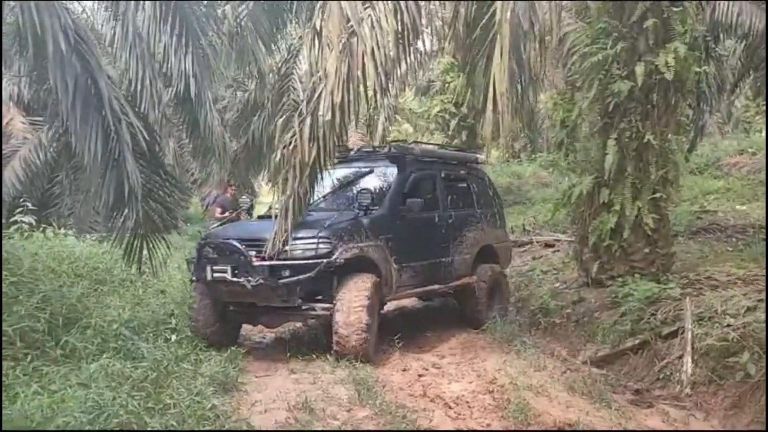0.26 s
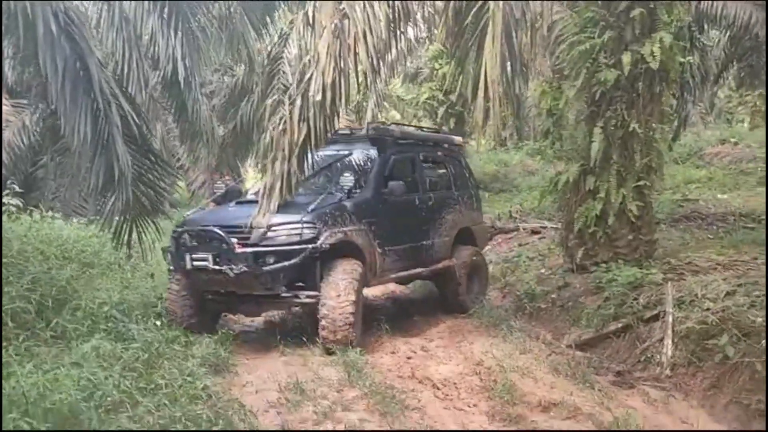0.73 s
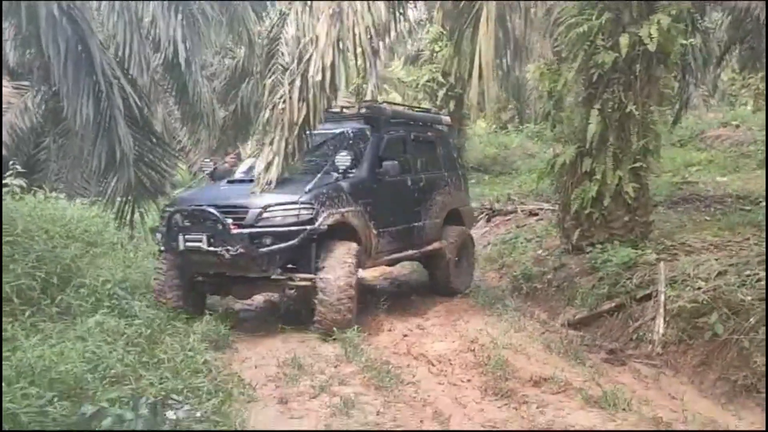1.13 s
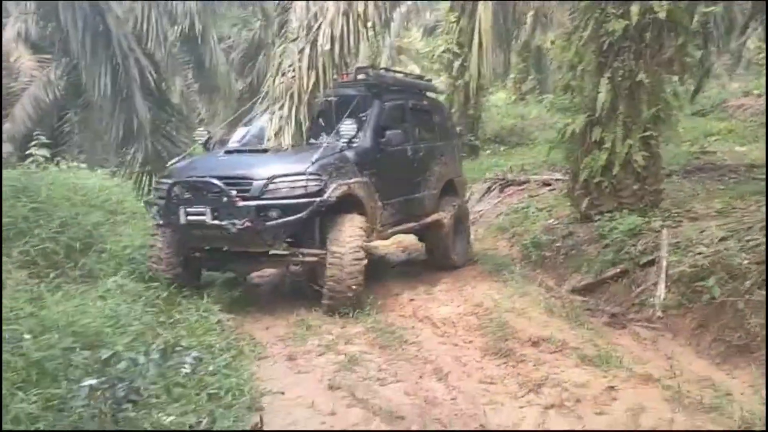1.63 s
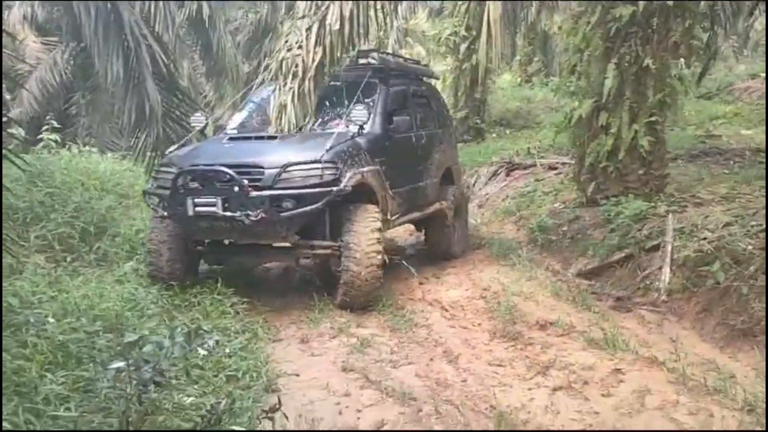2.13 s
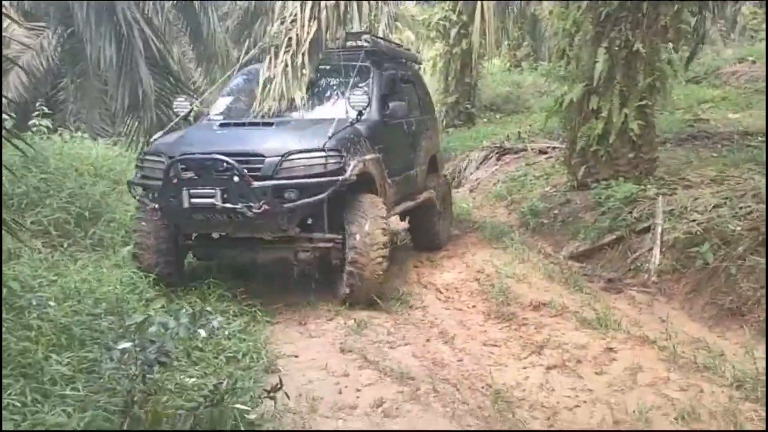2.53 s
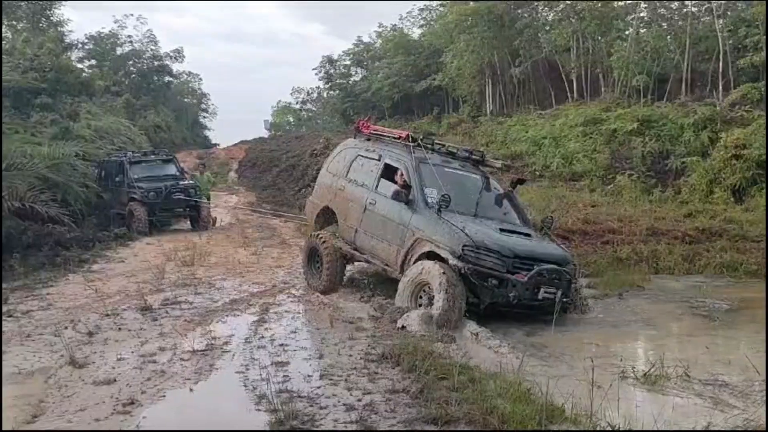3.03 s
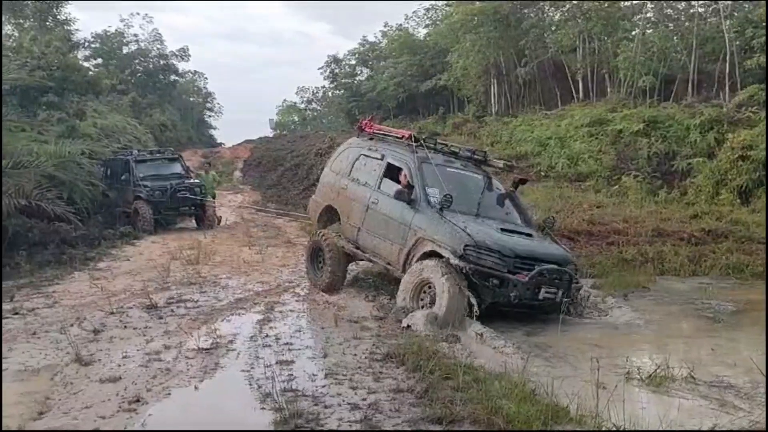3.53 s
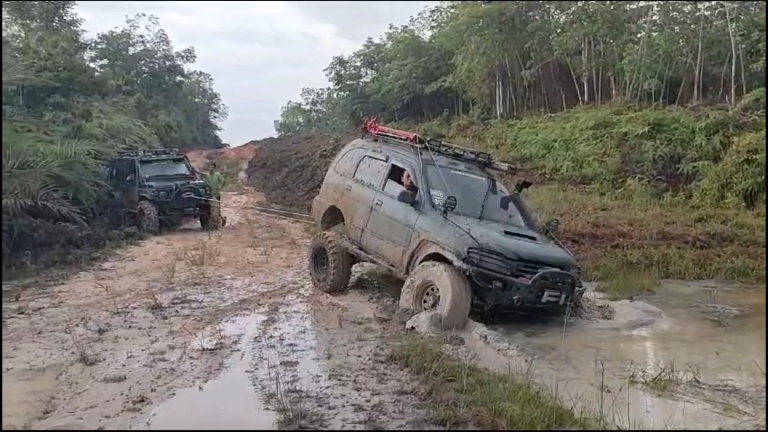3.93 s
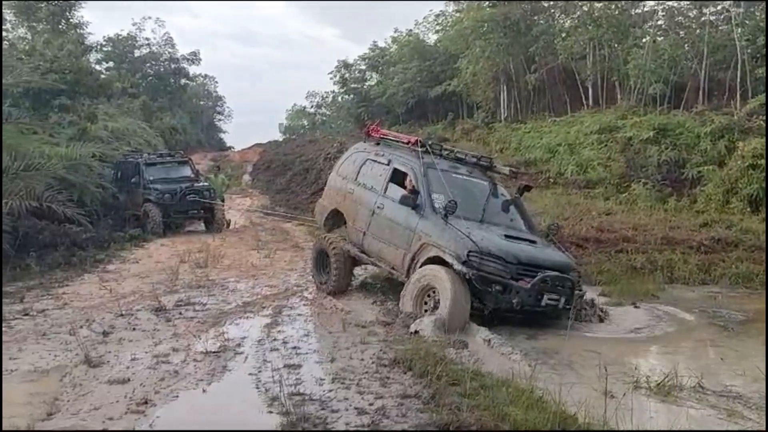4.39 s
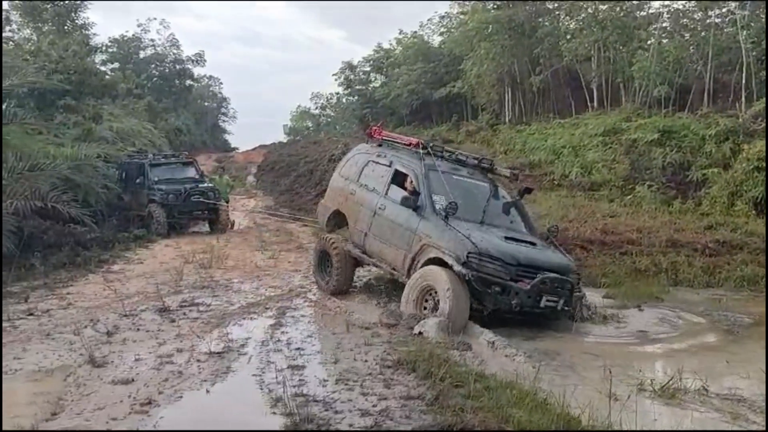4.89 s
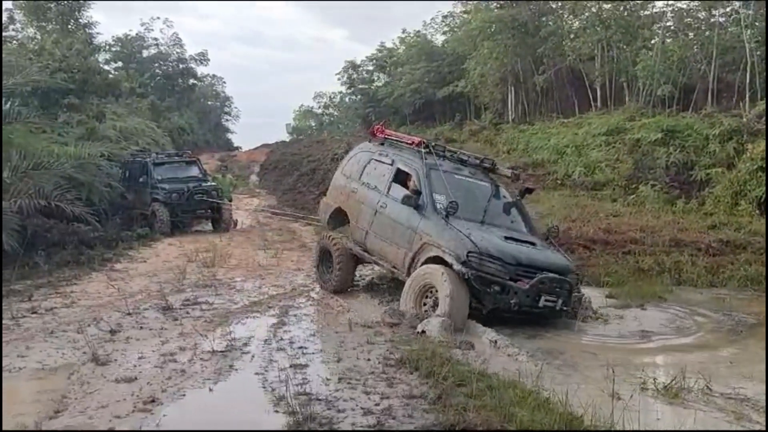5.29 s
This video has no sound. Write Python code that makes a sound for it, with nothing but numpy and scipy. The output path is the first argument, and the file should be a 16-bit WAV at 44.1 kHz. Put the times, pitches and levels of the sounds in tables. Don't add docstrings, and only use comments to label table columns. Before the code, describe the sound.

A lumpy diesel engine growls up and down through mud, cuts to brief silence, then a faster, whining engine strains and winds down.

```python
import sys
import numpy as np
from scipy import signal
from scipy.fft import rfft, irfft, next_fast_len
from scipy.io import wavfile
from scipy.ndimage import uniform_filter1d, map_coordinates

SR = 44100
rng = np.random.default_rng(int(sys.argv[2]) if len(sys.argv) > 2 else 0)


def voltage_ratio(level):
    return 10 ** (np.asarray(level, float) / 20)


def digitize_waveform(pressure):
    field = np.atleast_2d(pressure).T
    bounded = np.clip(field, -1, 1)
    quanta = np.round(bounded * 32767).astype(np.int16)
    wavfile.write(sys.argv[1], SR, quanta)


N = 244781

# time_s, firing_rate_hz, load_db
FIRST_DRIVE = [(0.0, 30.7, -35), (0.18, 32.43, -25.5), (0.32, 35.58, -25), (0.5, 41.17, -17.5),
               (0.7, 44.22, -28), (0.81, 41.8, -20), (0.93, 38.35, -25), (1.04, 35.19, -30.5),
               (1.2, 30.72, -29), (1.37, 29.07, -26.5), (1.49, 33, -28), (1.58, 40.96, -15.5),
               (1.66, 46.16, -25.5), (1.76, 46.35, -27), (1.95, 51.3, -14.5), (2.13, 56.15, -20),
               (2.36, 51, -18), (2.555, 50.85, -16.5)]
# firing_rate_hz, level_db
FIRST_BOOM = [(29, -26), (32, -24), (35, -15), (39, -21), (44, -22.5), (46.5, -32.5), (50, -31),
              (55, -52.5)]
# level_db at mean load and speed, slope_db per Hz of firing rate, unsteadiness_db
FIRST_BARK = (-35.5, 0.44, 0.98)
FIRST_CLATTER = (-39, .02, 0.34)
FIRST_FOLLOW = (.4, 0.8, .5, 0.034)
# level_db at mean speed, slope_db per Hz of firing rate
FIRST_DEPTH = (3.3, -0.3)
# strength_db, lateness (in firings)
FIRST_CYLINDERS = [(-3, 0), (-4, -.012), (2.5, 0), (2, .012)]
# pitch_hz, level_db
FIRST_PIPE = [(15, -44), (30, -52.5), (50, -20.5), (68, 2.5), (95, -8.5), (125, 3), (165, 2.5), (195, 9.5),
              (222, 8), (255, -1.5), (330, 7.5), (400, -7), (520, -23), (1540, -120)]
# pitch_hz, level_db (per Hz)
FIRST_BLOCK = [(240, -2), (400, -21.5), (569, -5.5), (1050, -7.5), (1240, -6), (1640, -10.5), (1880, -4.5),
               (2190, -7.5), (3260, -11), (5740, -15), (6300, -18.5), (7010, -18), (8040, -30.5),
               (13300, -37.5), (15500, -35.5)]
# pitch_hz, likeness (0 to 1)
FIRST_ALIKE = [(400, 0.73), (800, 1), (1400, 0.31), (3000, 0.14), (8000, 0.38)]
# pitch_hz, level_db
FIRST_LEAN = [(60, -22), (150, -1.5), (380, 8), (950, -1), (2380, 0.5), (5980, -5), (15000, 6.5)]


def first_vehicle():
    hz, load_db, on = drive(FIRST_DRIVE)
    *pipe_db, clatter_db = layers(hz, load_db, FIRST_BOOM, FIRST_BARK, FIRST_CLATTER, FIRST_FOLLOW)
    turns = np.cumsum(hz) / SR
    approach_db_per_s = 1.29
    clatter_db = clatter_db + approach_db_per_s * np.arange(N) / SR * on
    depth_db = FIRST_DEPTH[0] + FIRST_DEPTH[1] * (hz - hz[on].mean())
    uneven = np.clip((hz - 42) / 11, .2, .5)
    pipe = exhaust(turns, FIRST_CYLINDERS, uneven, FIRST_PIPE, pipe_db, depth_db,
                   ring=.35, twist=3.0, scatter_db=1, jitter=.008, gas_db=-2)
    block = stereo(rng.standard_normal((2, N)), FIRST_BLOCK, FIRST_ALIKE, FIRST_LEAN, lag_s=0.000095)
    knocks = knocking(turns, 2, sharp=2.5, scatter_db=1.2)
    clatter = voltage_ratio(clatter_db + .9 * wobble(9)) * knocks * block
    return on * (pipe + clatter) + shield(turns)


# start_s, peak_db
SHIELD_KNOCKS = [(1.04, -33), (1.071, -31.5), (1.162, -27.5), (1.197, -25.5), (1.229, -26.5), (1.266, -26),
                 (1.298, -29.5), (1.331, -23.5), (1.366, -29.5), (1.399, -23), (1.435, -25), (1.464, -24),
                 (1.499, -29)]
# pitch_hz, level_db (per Hz)
SHIELD_PANEL = [(300, -31), (700, -1.5), (900, 1.5), (1300, 0.5), (1900, 2), (2600, -4), (3200, -15),
                (3900, -4), (5000, -30)]
# start_s, end_s, level_db
TIN_BUZZ = [
    (1.07, 1.18, -51),
    (1.2, 1.385, -54),
    (1.4, 1.5, -46),
]


def shield(turns):
    knocks, t = np.zeros(N), np.arange(SR // 10) / SR
    for start_s, peak_db in SHIELD_KNOCKS:
        fade = voltage_ratio(peak_db - 2 - 60 * t / 0.11)
        knocks[round(start_s * SR):][:len(t)] += fade * (1 - np.exp(-t / .002))
    panel = stereo(rng.standard_normal((2, N)), SHIELD_PANEL, FIRST_ALIKE, FIRST_LEAN, lag_s=0.00018)
    tin = unit(filtered(rng.standard_normal((2, N)), lambda f: 1 / (1 + ((f - 7100) / 330) ** 4)))
    loose = bursts(TIN_BUZZ, 600, 400, -120)
    return knocks * panel + loose * knocking(2 * turns, 8, sharp=2.5, scatter_db=7) * tin


# time_s, firing_rate_hz, load_db
SECOND_DRIVE = [(2.61, 84.9, -22.5), (2.8, 83.58, -17), (2.95, 80.1, -21), (3.03, 83.24, -18.5),
                (3.17, 87.7, -22), (3.39, 89.46, -24.5), (3.55, 76.74, -33), (3.81, 62.68, -25.5),
                (3.99, 66.5, -20), (4.1, 76.67, -16.5), (4.2, 84, -19), (4.37, 80.72, -28.5),
                (4.6, 77.27, -21.5), (4.8, 81.72, -21), (5.01, 80.26, -27), (5.16, 72.26, -27),
                (5.25, 72.04, -26), (5.55, 55.83, -28)]
# firing_rate_hz, level_db
SECOND_BOOM = [(58, -42), (63, -45), (68, -36), (73, -28), (80, -33), (84, -34), (89, -35)]
# level_db at mean load and speed, slope_db per Hz of firing rate, unsteadiness_db
SECOND_BARK = (-30.5, 0.67, 3.5)
SECOND_CLATTER = (-25.5, -0.018, 0.68)
SECOND_FOLLOW = (0.82, 1, 0.23, 0.05)
# level_db at mean speed, slope_db per Hz of firing rate
SECOND_DEPTH = (.1, 0.022)
# strength_db, lateness (in firings)
SECOND_CYLINDERS = [(.6, 0), (-.4, .004), (.3, 0), (-.7, -.004)]
# pitch_hz, level_db
SECOND_PIPE = [(18, -74), (40, -50), (62, -11.5), (85, -16.5), (125, -5), (165, 8.5), (200, -3), (260, -5),
               (325, -2), (420, -20), (520, -34), (700, -26), (1200, -36), (1540, -120)]
# pitch_hz, level_db (per Hz)
SECOND_BLOCK = [(240, 2), (400, -6), (552, -13), (1110, -3.5), (1460, -10.5), (1660, -6.5), (3310, -12.5),
                (3740, -11), (4100, -15.5), (5740, -18.5), (9670, -39), (10800, -33), (11300, -36.5),
                (14400, -38.5), (15500, -28)]
# pitch_hz, likeness (0 to 1)
SECOND_ALIKE = [(400, 1), (800, 0.77), (1400, 0.28), (3000, 0.08), (8000, 0.18)]
# pitch_hz, level_db
SECOND_LEAN = [(60, -9), (150, -1), (380, -3), (950, -0.5), (2380, -4.5), (5980, -1), (15000, -6)]


def second_vehicle():
    hz, load_db, on = drive(SECOND_DRIVE)
    *pipe_db, clatter_db = layers(hz, load_db, SECOND_BOOM, SECOND_BARK, SECOND_CLATTER, SECOND_FOLLOW)
    before_drop = np.clip((THUMPS[0][0] - np.arange(N) / SR) / 0.0093, 0, 1)
    pipe_db[0] = pipe_db[0] - 7 * before_drop
    turns = np.cumsum(hz) / SR
    depth_db = SECOND_DEPTH[0] + SECOND_DEPTH[1] * (hz - hz[on].mean())
    pipe = exhaust(turns, SECOND_CYLINDERS, np.ones(N), SECOND_PIPE, pipe_db, depth_db,
                   ring=.4, twist=-.6, scatter_db=1.2, jitter=.008, gas_db=-5)
    block = stereo(rng.standard_normal((2, N)), SECOND_BLOCK, SECOND_ALIKE, SECOND_LEAN, lag_s=0.0003)
    knocks = knocking(turns, 0.72, sharp=0.88, scatter_db=1.5)
    clatter = voltage_ratio(clatter_db + 1.0 * wobble(10)) * knocks * block
    return on * (pipe + clatter + gear_whine(turns) + knock_ring(turns, hz, load_db))


GEAR_TONES = (12.25, 16.1, 20.3, 24.5)
# start_s, end_s, tones per firing, level_db
GEAR_SINGS = [
    (2.95, 3.42, 12.25, -41),
    (3.8, 3.92, 12.25, -42),
    (4.08, 4.16, 12.25, -41),
    (4.55, 4.85, 12.25, -46),
    (5.0, 5.15, 12.25, -41),
    (3.1, 3.22, 16.1, -48),
    (4.72, 4.9, 20.3, -46),
    (3.68, 4.02, 24.5, -45),
    (4.27, 5.1, 24.5, -50),
    (5.27, 5.36, 24.5, -47),
]


def gear_whine(turns):
    whine = np.zeros(N)
    for tone in GEAR_TONES:
        rows = [(start, end, db) for start, end, mesh, db in GEAR_SINGS if mesh == tone]
        gain = bursts(rows, 90, 90, -56) * voltage_ratio(5 + 3 * wobble(14))
        whine += gain * np.sin(2 * np.pi * tone * turns + .8 * wobble(30))
    return whine


# pitch_hz, level_db
KNOCK_RING = [(380, -48), (560, -54), (780, -46), (1050, -43.5), (1250, -56)]


def knock_ring(turns, hz, load_db):
    swell_db = 0.51 * (load_db - load_db.mean())
    howl = np.zeros(N)
    for k in range(5, 15):
        gain = voltage_ratio(along(KNOCK_RING, k * hz) + swell_db + 5 * wobble(8))
        howl += gain * np.sin(2 * np.pi * k * turns + .6 * wobble(25))
    return howl


# delay_s, level_db
ECHOES = [(.0043, -9.5), (.0098, -10), (.017, -9), (.026, -12), (.037, -10.5)]


def exhaust(turns, cylinders, uneven, pipe, levels_db, depth_db, ring, twist, scatter_db, jitter, gas_db):
    firing = np.arange(1, int(turns[-1]))
    share = np.interp(firing, turns, uneven)
    strength_db, late = share * np.transpose(cylinders)[:, firing % 4]
    chance = rng.standard_normal((len(firing), 2))
    at = np.interp(firing + late + jitter * chance[:, 0], turns, np.arange(N)).astype(int)
    puffs = unit(np.bincount(at, voltage_ratio(strength_db + scatter_db * chance[:, 1]), N))
    gas = filtered(rng.standard_normal(N), lambda hz: voltage_ratio(gas_db) * hz / (hz + 400))

    def response(hz):
        echoes = sum(voltage_ratio(db) * np.exp(-2j * np.pi * hz * s) for s, db in ECHOES)
        edges = [0 * hz, below(hz, 121) ** 2, below(hz, 180), below(hz, 260), 1 + 0 * hz]
        bands = np.diff(edges, axis=0)
        return causal(pipe, hz, ring, twist) * (1 + (1 - below(hz, 179)) * echoes) * bands

    boom, low, high, bark = filtered(puffs + gas, response)
    parts = boom, voltage_ratio(depth_db) * low + high, bark
    return sum(voltage_ratio(db) * steady(part, span_s=0.14) for db, part in zip(levels_db, parts))


def knocking(turns, knock_db, sharp, scatter_db):
    size_db = scatter_db * rng.standard_normal(int(turns[-1]) + 1)[turns.astype(int)]
    return steady(voltage_ratio((knock_db + size_db) * np.exp(-sharp * (turns % 1))), span_s=0.078)


def drive(rows):
    s, rate_hz, load_db = np.transpose(rows)
    t = np.arange(N) / SR
    flywheel_s = .1
    hz = uniform_filter1d(np.interp(t, s, rate_hz), int(flywheel_s * SR))
    return hz, np.interp(t, s, load_db), (t > s[0] - .04) & (t < s[-1] + .02)


def layers(hz, load_db, boom, bark, clatter, follow):
    def lift(db, slope, loose):
        return db + slope * (hz - hz.mean()) + loose * wobble(7)

    rest = [along(boom, hz), load_db.mean(), lift(*bark), lift(*clatter)]
    return [db + share * (load_db - load_db.mean()) for db, share in zip(rest, follow)]


# start_s, peak_db
THUMPS = [
    (3.012, -25),
]


def thump():
    out, t = np.zeros(N), np.arange(SR // 4) / SR
    for start_s, peak_db in THUMPS:
        out[round(start_s * SR):][:len(t)] += voltage_ratio(peak_db - 60 * t / 0.055) * np.sin(2 * np.pi * 48 * t)
    return out


# start_s, end_s, level_db
INSECT_PHRASES = [
    (2.66, 3.76, -55.5),
    (3.87, 4.05, -58),
    (4.15, 4.3, -66),
    (4.4, 5.1, -55),
    (5.17, 5.6, -52.5),
]
# pitch_hz, width_hz, level_db
INSECT_VOICES = [(10464, 130, -2.5), (8970, 450, -11.5)]


def insects():
    def voices(hz):
        return sum(voltage_ratio(db) / (1 + ((hz - pitch) / width) ** 2) for pitch, width, db in INSECT_VOICES)

    beat = voltage_ratio(4.6 * np.sin(2 * np.pi * 61 * np.arange(N) / SR + wobble(3.3)))
    buzz = unit(beat * filtered(rng.standard_normal((2, N)), voices))
    side_db = np.array([[1], [3]])
    return bursts(INSECT_PHRASES, 150, 120, -120) * voltage_ratio(side_db) * buzz


# start_s, end_s, level_db
AIR_GUSTS = [
    (0, .02, -33.5),
    (.2, .75, -47),
    (1.03, 1.6, -31.5),
    (1.95, 2.3, -44),
    (2.98, 3.05, -53),
    (4.0, 4.12, -55),
    (4.52, 4.8, -56),
]


def rumble():
    push = unit(filtered(rng.standard_normal(N), lambda hz: below(hz, 48) * (1 - below(hz, 30))))
    return bursts(AIR_GUSTS, 130, 160, -56.5) * push


def bursts(rows, rise, fall, rest_db):
    t = np.arange(N) / SR
    gain = voltage_ratio(rest_db)
    for start, end, db in rows:
        gain = gain + voltage_ratio(db - rise * np.clip(start - t, 0, 1) - fall * np.clip(t - end, 0, 1))
    return gain


def unit(x):
    return x / np.sqrt(np.mean(x ** 2) + 1e-20)


def steady(x, span_s):
    size = int(span_s * SR)
    power = uniform_filter1d(uniform_filter1d(x * x, size), size)
    return x / np.sqrt(np.abs(power) + 1e-12)


def along(points, hz):
    f, v = np.transpose(points)
    return np.interp(np.log(hz + 1), np.log(f + 1), v)


def wobble(rate):
    coarse = np.arange(0, N + 64, 64)
    knots = rng.standard_normal(int(N * rate / SR) + 4)
    return np.interp(np.arange(N), coarse, map_coordinates(knots, [coarse * rate / SR]))


def filtered(x, response):
    m = 2 * next_fast_len(N // 2 + 4096)
    return irfft(rfft(x, m) * response(np.fft.rfftfreq(m, 1 / SR)), m)[..., :N]


def causal(spectrum, hz, ring, twist):
    cep = irfft(np.log(np.maximum(voltage_ratio(along(spectrum, hz)), 1e-3)))
    cep[1:len(cep) // 2] *= 2
    cep[len(cep) // 2 + 1:] = 0
    log_gain = rfft(cep)
    spread = 4.5e-5 * np.pi * np.clip(hz - 130, 0, 600) ** 2
    return np.exp(log_gain.real + 1j * (ring * log_gain.imag + twist - spread))


def below(hz, edge_hz):
    return 1 / (1 + (hz / edge_hz) ** 12)


def stereo(pair, spectrum, alike, lean, lag_s):
    def colour(hz):
        turn = np.arccos(np.clip(along(alike, hz), -1, 1)) / 2
        return voltage_ratio(along(spectrum, hz)) * (1 - below(hz, 138)) * [np.cos(turn), np.sin(turn)]

    def place(hz):
        late = 2 * np.pi * hz * lag_s * (1 - below(hz, 1064))
        tilt = along(lean, hz) / 20 * np.log(10) + 1j * late
        return np.exp(np.outer([.5, -.5], tilt))

    mid, side = filtered(pair, colour)
    return unit(filtered([mid + side, mid - side], place))


def thinned(x, from_hz, hole_db):
    hz, _, z = signal.stft([x[0] + x[1], x[0] - x[1]], SR, nperseg=2048)
    power = np.abs(z) ** 2
    patch = uniform_filter1d(uniform_filter1d(power, size=5, axis=1), size=2, axis=2)
    around = uniform_filter1d(uniform_filter1d(power, size=35, axis=1), size=2, axis=2)
    limit_db = hole_db - 40 * below(hz, 900) - 4 * below(hz, from_hz) + 1.3 * (1 - below(hz, 2 * from_hz))
    keep = patch > around * voltage_ratio(2 * limit_db)[:, None]
    mid, side = signal.istft(z * keep, SR, nperseg=2048)[1][:, :N]
    return np.array([mid + side, mid - side]) / 2


def scene():
    return first_vehicle() + second_vehicle() + thump() + rumble() + insects()


def low_pass(x):
    return signal.sosfilt(signal.butter(12, 15690, fs=SR, output="sos"), x)


# start_s, end_s
SILENCE = (2.558, 2.6095)


def record(dry):
    t = np.arange(N) / SR
    start_s, end_s = SILENCE
    creep = voltage_ratio(-14 * np.exp(-np.abs(t - end_s) / .08))
    gate = np.clip((start_s - t) / .002, 0, 1) + creep * np.clip((t - end_s) / .001, 0, 1)
    mix = thinned(dry, from_hz=4000, hole_db=-.4) * gate
    return low_pass(mix)


dry = scene()
out = record(dry)
digitize_waveform(out)
```